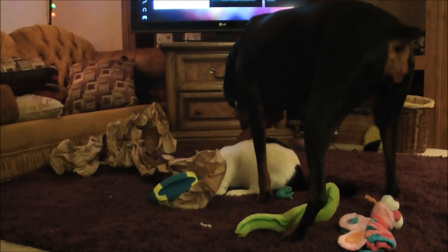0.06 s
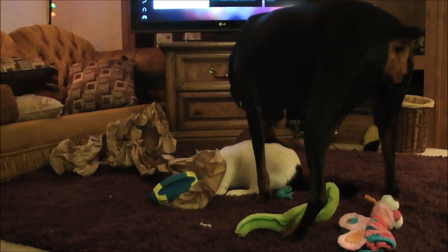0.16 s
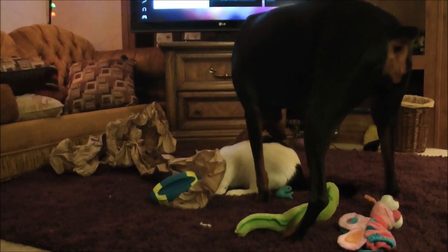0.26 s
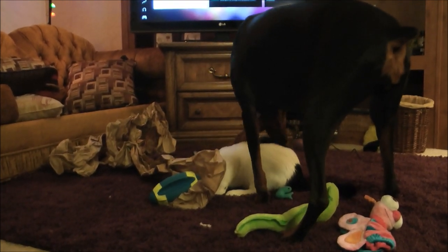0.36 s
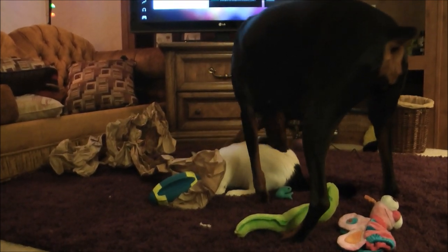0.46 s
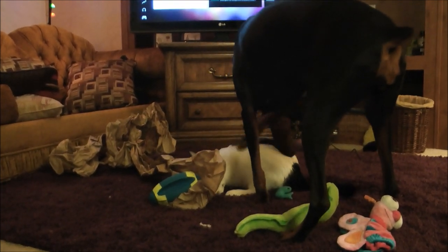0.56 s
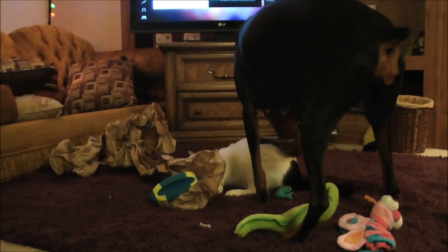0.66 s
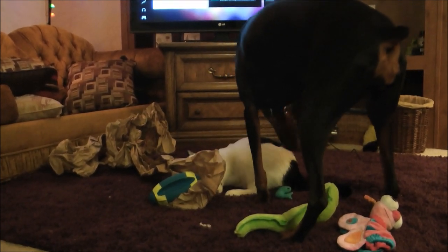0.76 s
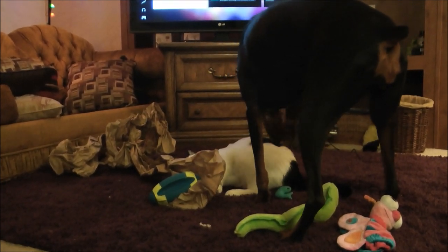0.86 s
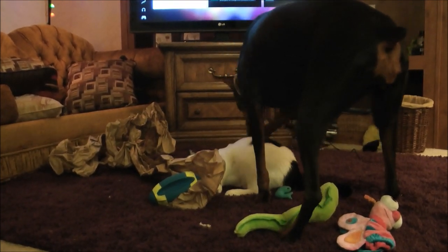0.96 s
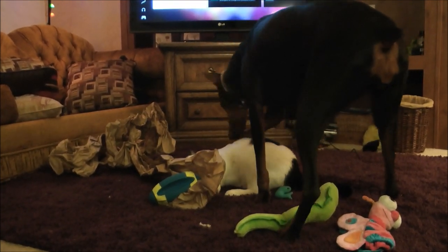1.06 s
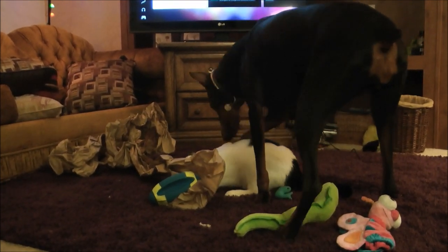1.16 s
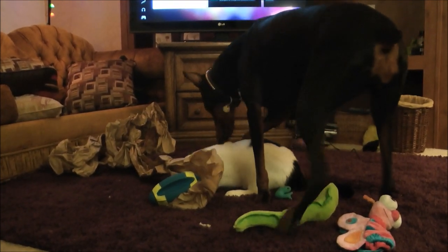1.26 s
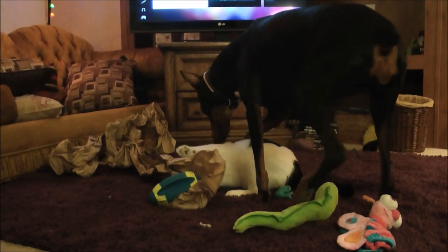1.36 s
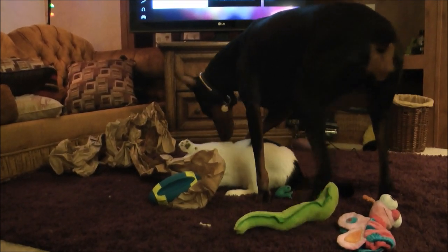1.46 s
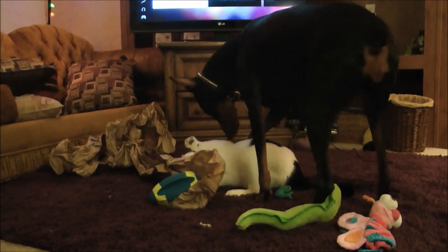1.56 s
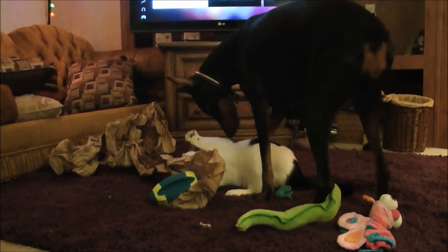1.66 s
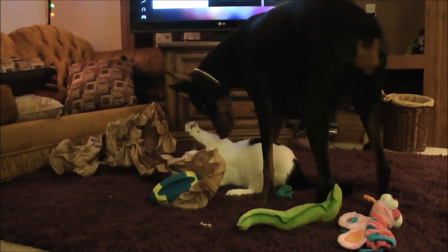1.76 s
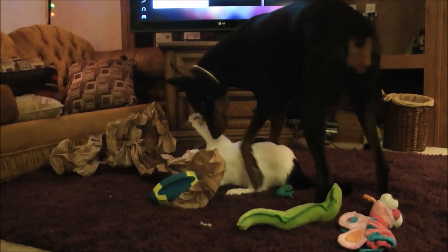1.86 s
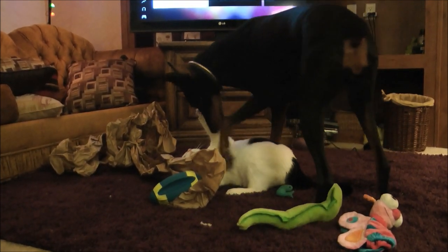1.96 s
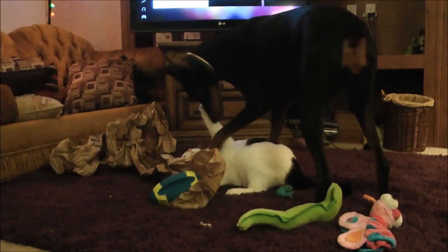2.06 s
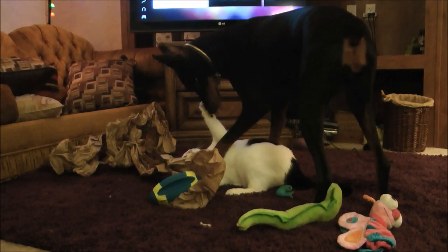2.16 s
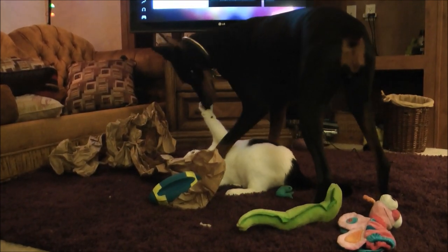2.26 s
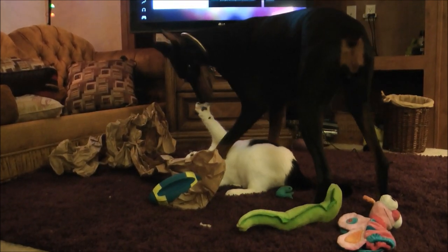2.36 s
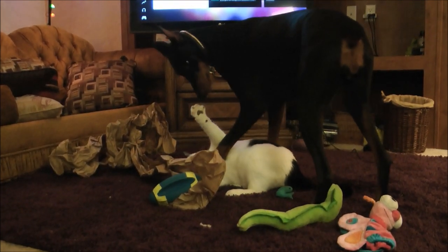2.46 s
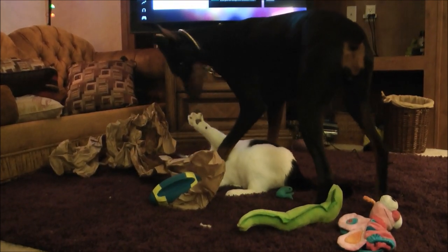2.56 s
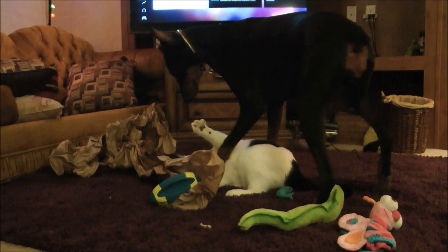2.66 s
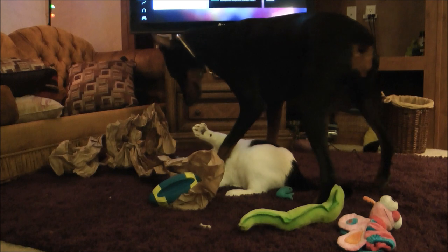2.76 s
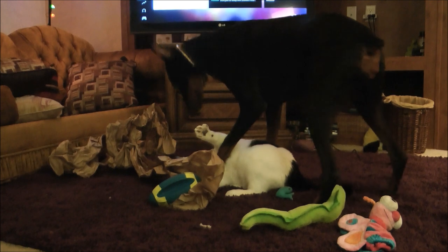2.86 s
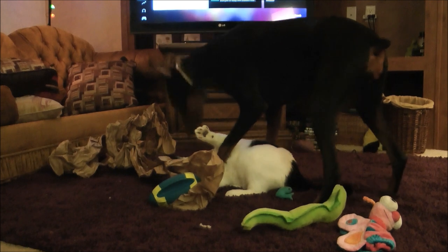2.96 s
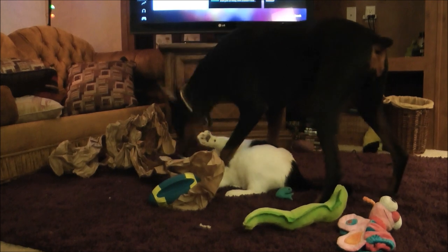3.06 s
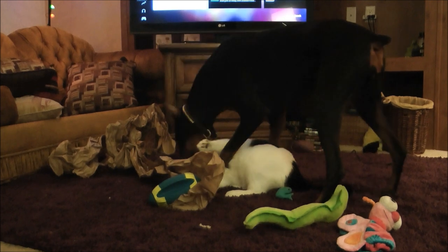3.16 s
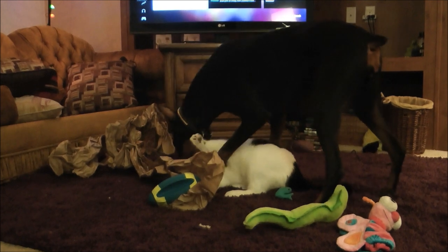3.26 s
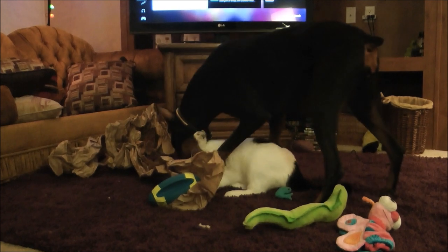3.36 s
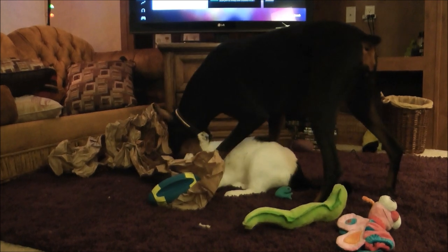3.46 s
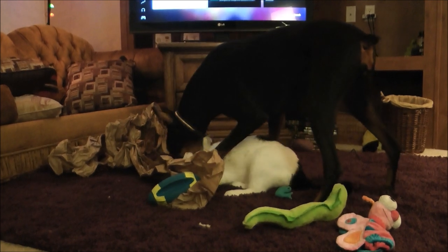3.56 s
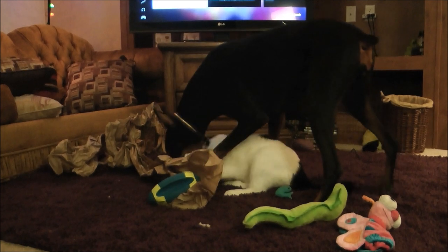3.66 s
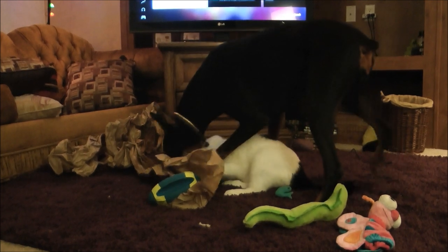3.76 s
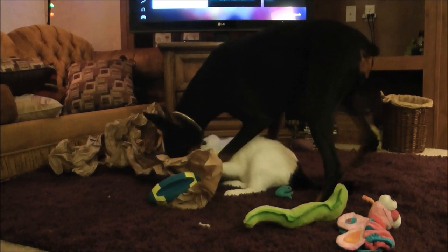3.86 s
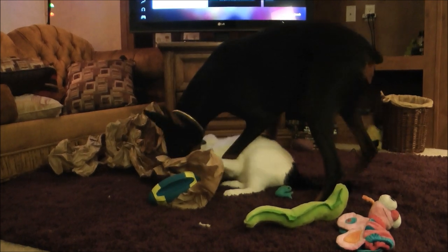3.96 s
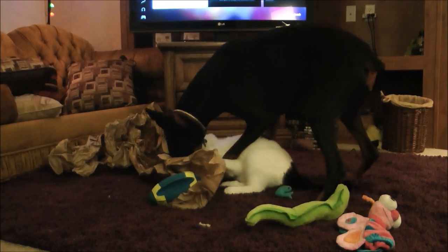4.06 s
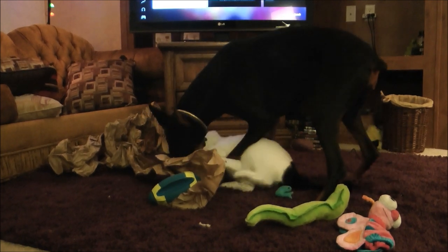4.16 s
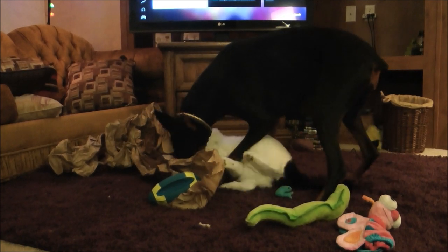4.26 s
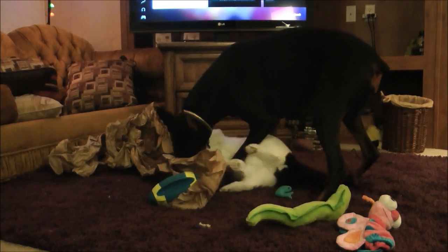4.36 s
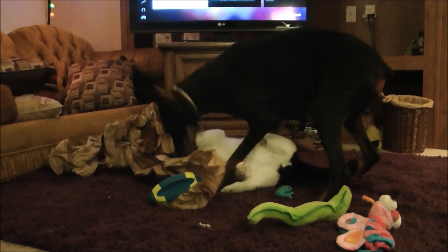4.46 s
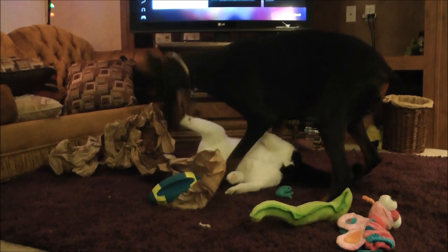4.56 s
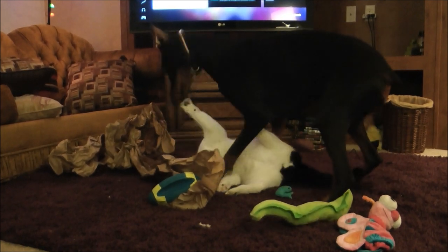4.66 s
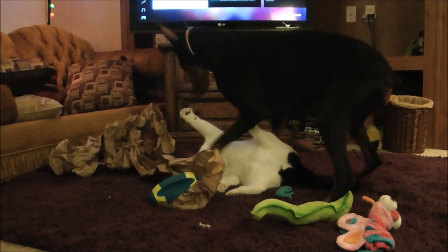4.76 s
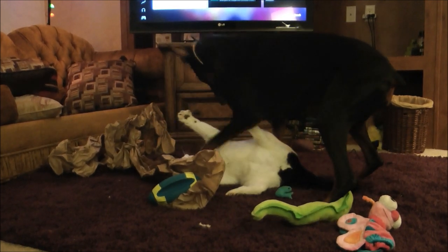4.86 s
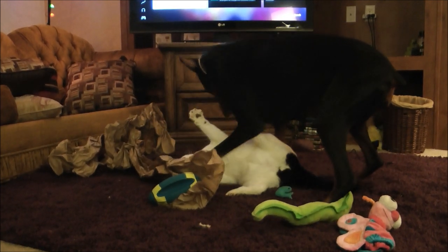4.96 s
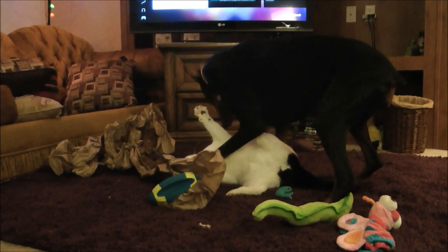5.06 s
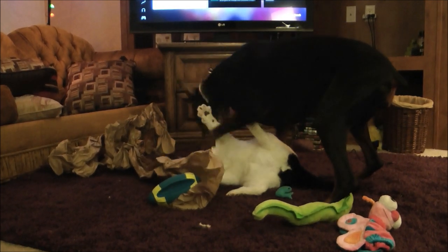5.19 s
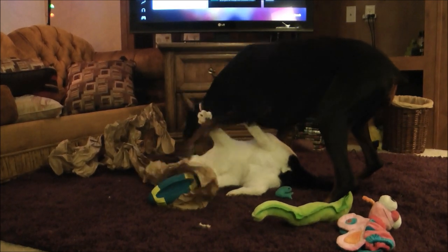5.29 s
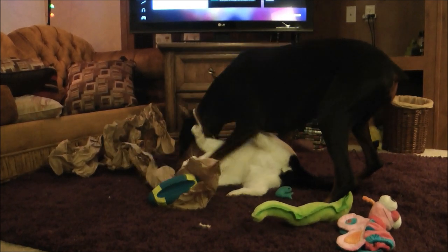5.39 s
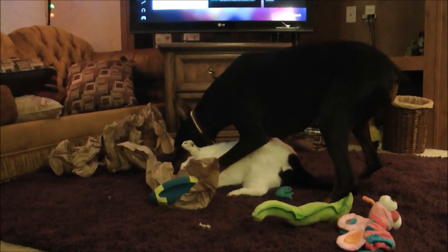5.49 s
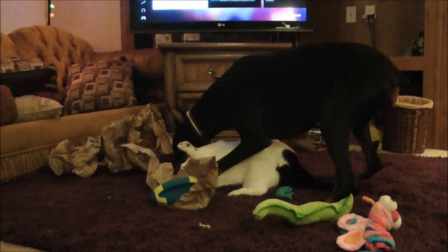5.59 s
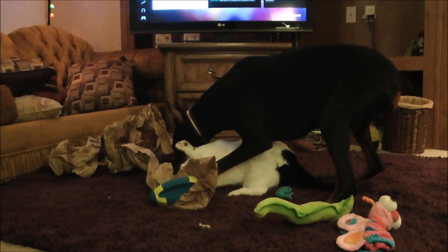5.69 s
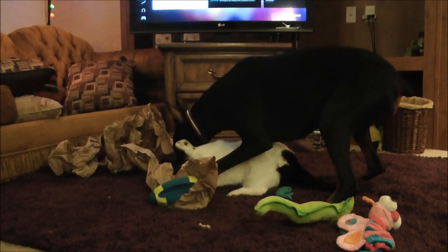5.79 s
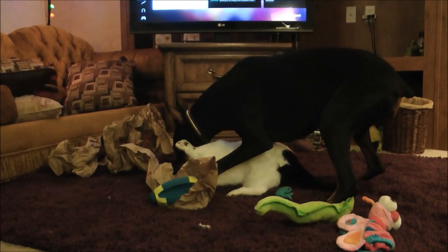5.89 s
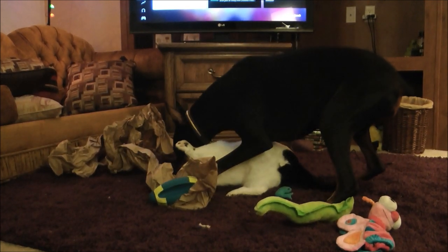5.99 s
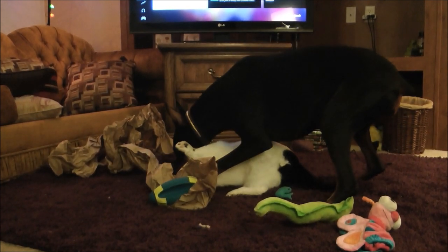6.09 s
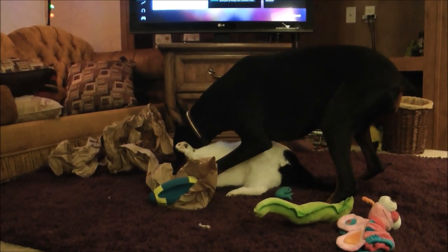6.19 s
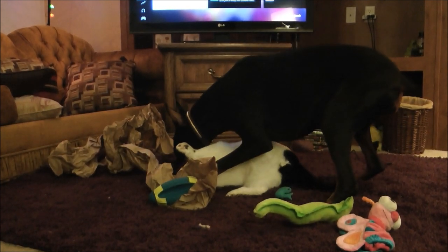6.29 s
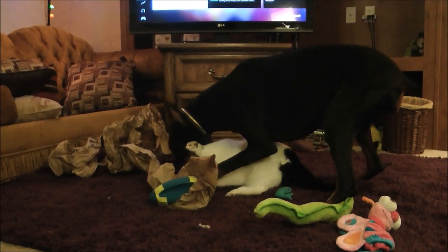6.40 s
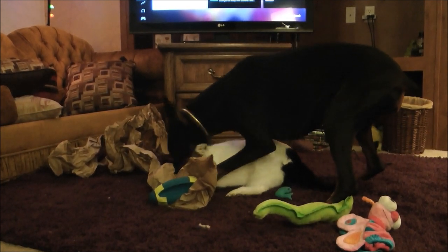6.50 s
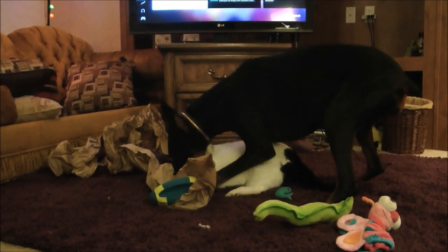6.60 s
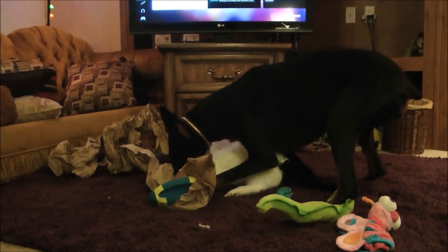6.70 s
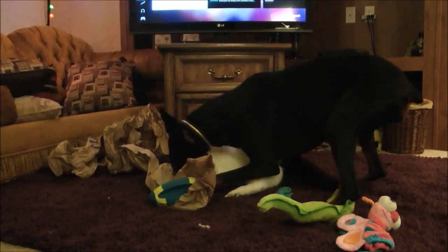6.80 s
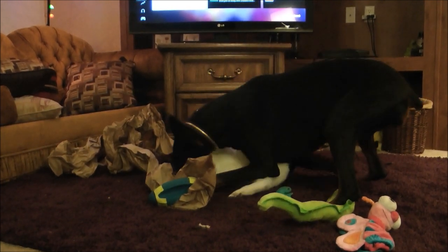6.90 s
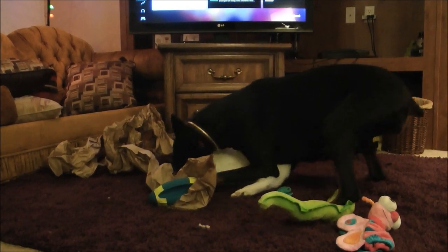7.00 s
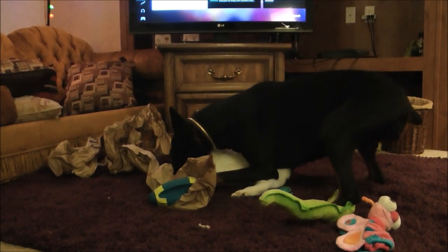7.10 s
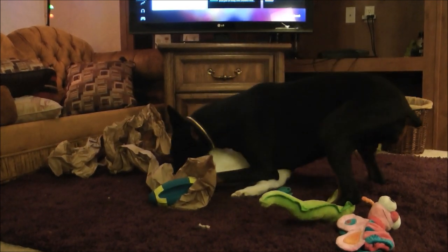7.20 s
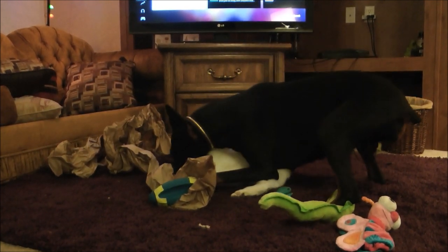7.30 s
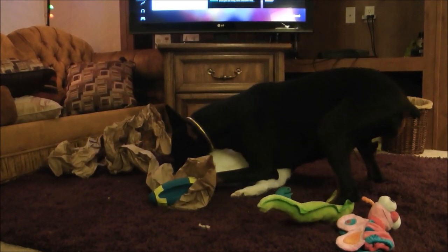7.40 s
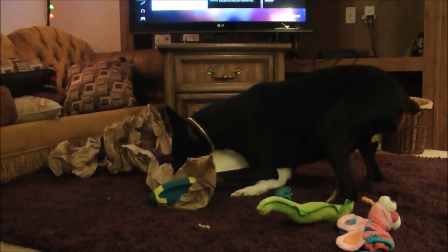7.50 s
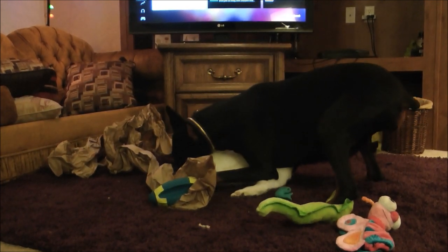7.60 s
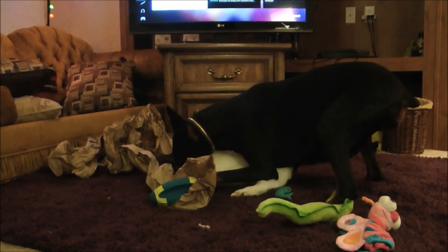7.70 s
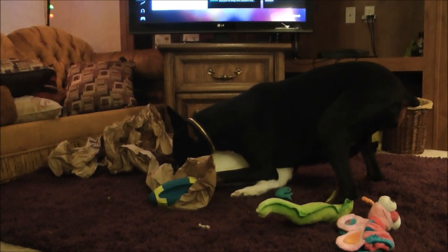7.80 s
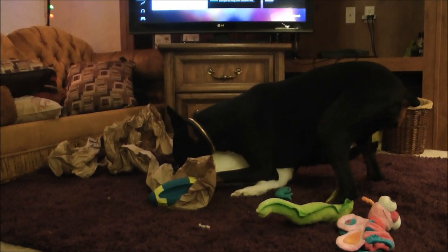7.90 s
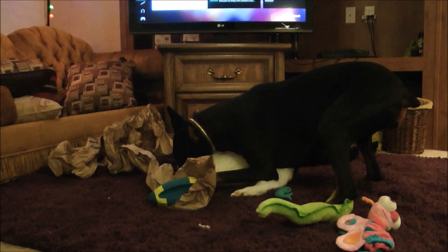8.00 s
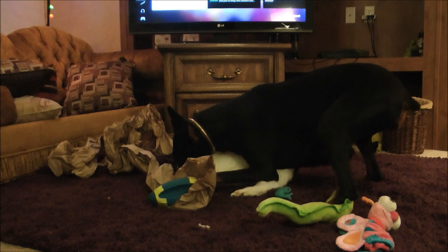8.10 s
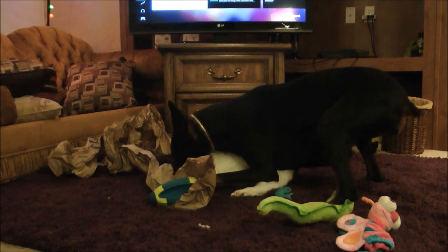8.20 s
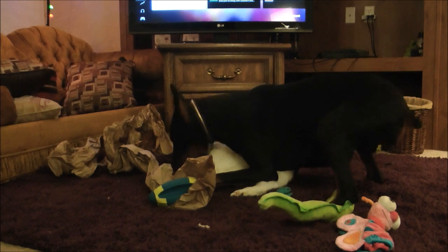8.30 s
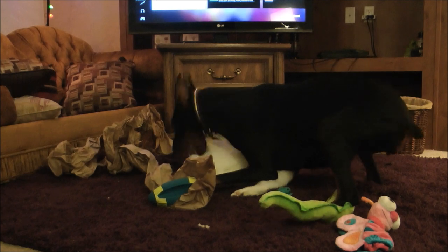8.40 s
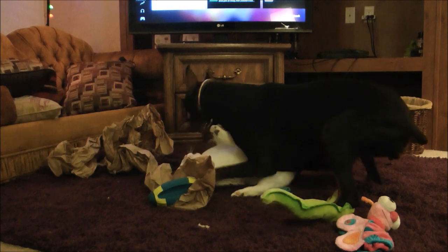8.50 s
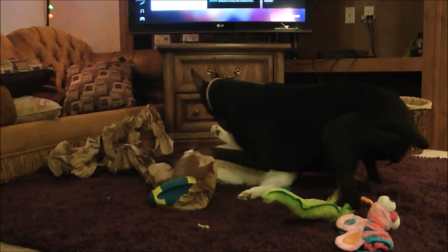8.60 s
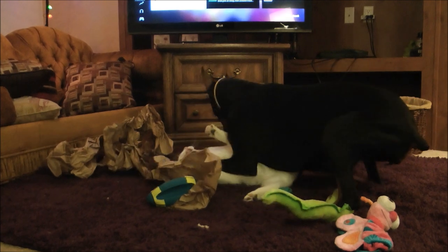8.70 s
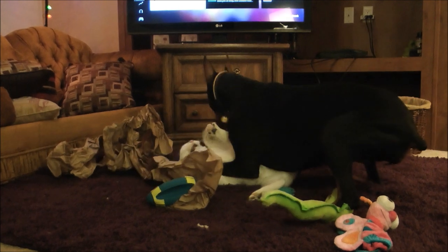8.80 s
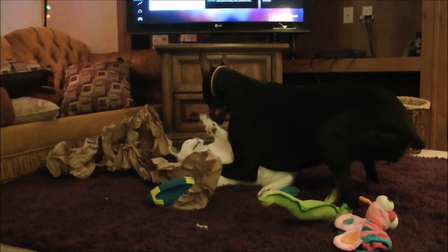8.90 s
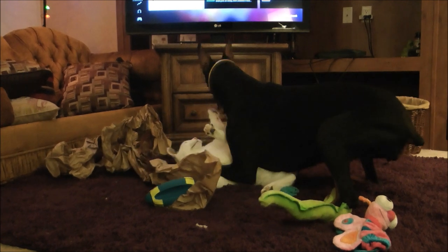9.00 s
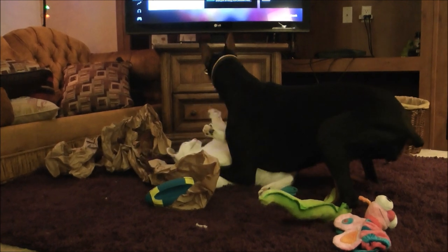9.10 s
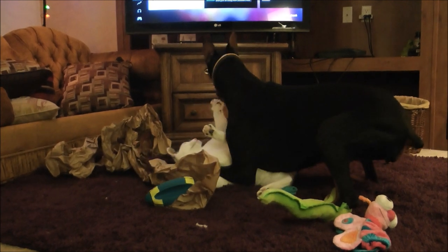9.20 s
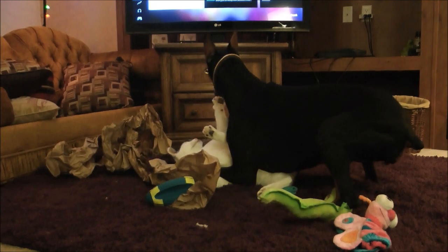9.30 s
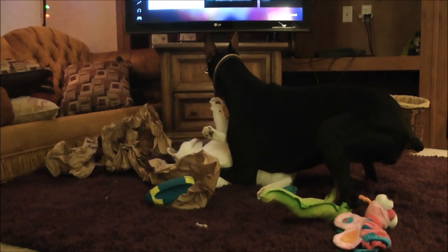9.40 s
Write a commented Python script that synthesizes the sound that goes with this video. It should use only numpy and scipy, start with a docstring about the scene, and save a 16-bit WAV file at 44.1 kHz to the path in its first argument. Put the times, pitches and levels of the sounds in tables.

```python
"""Dog and cat tussle in packing paper

A dog noses and paws at a cat on a living-room carpet, among wads of crumpled packing paper.
Random clicks and coloured noise follow each shove as paper crackle and carpet scuffs; short noise bursts
make the snaps, ticks and bumps, and a collar tag chimes once from decaying sines.
A fan and mains hum run behind as filtered noise and wavering tones. Loud peaks duck the level, which creeps back."""
import sys
import numpy as np
from scipy import signal
from scipy.fft import rfft, irfft
from scipy.io import wavfile
from scipy.ndimage import uniform_filter1d

SR = 44100
rng = np.random.default_rng(int(sys.argv[2]) if len(sys.argv) > 2 else 0)


def persist_wave(psi):
    """Save psi, clipped to +-1, as 16-bit WAV."""
    counts = np.round(np.clip(psi, -1, 1) * 32767).astype(np.int16)
    wavfile.write(sys.argv[1], SR, np.atleast_2d(counts).T)


N = 416744
TIME = np.arange(N) / SR


def undb(db):
    """Decibels to amplitude gain."""
    return 10 ** (np.asarray(db) / 20)


def unit(x):
    """Scale to rms 1."""
    return x / np.sqrt(np.mean(x ** 2))


def walk(rate):
    """Smooth random drift with a spread of 1, changing about rate times a second."""
    hold = max(int(SR / rate), 2)
    steps = np.repeat(rng.standard_normal(N // hold + 1), hold)
    return unit(uniform_filter1d(steps, hold)[:N])


def tilt(points, slope_db):
    """Tip a spectrum by so many dB per octave."""
    hz, db = np.transpose(points)
    return np.column_stack([hz, db + slope_db * np.log2(hz)])


def colour(x, points, size=4096):
    """Minimum-phase filter through (Hz, dB) points; white noise keeps its power."""
    hz, db = np.transpose(points)
    bins_hz = np.fft.rfftfreq(size, 1 / SR)
    gain = unit(undb(np.interp(np.log(bins_hz + 1), np.log(hz), db)))
    # folding the cepstrum forward in time makes the filter causal
    cepstrum = irfft(np.log(gain))
    cepstrum[1:size // 2] *= 2
    cepstrum[size // 2 + 1:] = 0
    impulse = irfft(np.exp(rfft(cepstrum)))
    return signal.fftconvolve(x, impulse)[:len(x)]


def resonate(x, hz, q):
    """One resonance with gain 1 at its centre, held to SR / 4 at most and a Q of 0.6 at least."""
    b, a = signal.iirpeak(min(hz, SR / 4), max(q, .6), fs=SR)
    return signal.lfilter(b, a, x)


def add(track, s, sound):
    """Mix a sound into a track at time s."""
    i = max(int(s * SR), 0)
    track[i:i + len(sound)] += sound[:N - i]


def clicks(rate, scatter_db):
    """Random clicks, rate a second, with a few much larger than the rest; rms 1."""
    hit = rng.random(N) < rate / SR
    size = undb(scatter_db * np.minimum(rng.exponential(size=N), 4))
    sign = rng.choice([-1, 1], N)
    # a denser stretch gets smaller clicks, so that its power stays even
    return unit(hit * size * sign / np.sqrt(rate))


def knocks(rows, q, size=8192):
    """Short pushes into a damped body that rings at one pitch."""
    track, t = np.zeros(N), TIME[:size]
    noises = rng.standard_normal((len(rows), size))
    for (s, db, hz, fade_s), noise in zip(rows, noises):
        push = noise * np.exp(-t / fade_s)
        ring = resonate(resonate(push, hz, q), hz, q / 2)
        add(track, s, undb(db) * ring / np.max(np.abs(ring)))
    return track


def room(x, ceiling_db, tail_db, side_db=-14, ceiling_s=.0094, path_spread=.06, t60=0.19):
    """Direct sound, a bounce off the ceiling and a short furnished-room tail; gives mid and side."""
    t = TIME[:SR // 2]
    build_up = np.clip(t / ceiling_s, 0, 1) ** 2
    tails = rng.standard_normal((2, len(t))) * build_up * np.exp(-np.log(1000) * t / t60)
    mid, side = undb(tail_db) * tails / np.linalg.norm(tails, axis=1, keepdims=True)
    mid[0] += 1  # direct sound
    bounce_s = ceiling_s * (1 + path_spread * rng.uniform(-1, 1))
    mid[int(bounce_s * SR)] += undb(ceiling_db)
    paths = np.array([mid, undb(side_db) * side]) / np.linalg.norm(mid)
    return signal.oaconvolve(x[None], paths, axes=1)[:, :N]


# moving air, spectrum shape in the mid: [pitch_hz, relative_level_db per Hz]
AIR_SPECTRUM = [(25, -16.5), (60, -4.5), (90, 5), (180, -2), (270, 2), (420, -3.5), (490, -12), (760, -6.5),
                (900, -19.5), (1330, -18.5), (1900, -11.5), (5000, -15.5), (8300, -25.5), (10000, -23)]
# moving air, spectrum shape of the left-right difference: [pitch_hz, relative_level_db per Hz]
AIR_SIDE_SPECTRUM = [(25, 3), (100, 2), (300, 9), (500, 1), (1000, -9.5), (5000, -23), (9000, -20),
                     (12000, -54)]
# narrow resonances in the fan's air noise: [pitch_hz, level_db rms, q without unit]
FAN_RESONANCES = [(1048, -81, 51), (1415, -81.5, 77), (2650, -79.5, 110)]
# steady tones of the mains and the fan: [pitch_hz, level_db rms in the mid, waver_hz]
HUM_TONES = [(121.8, -64.5, 0.43), (256, -74.5, 3), (409.4, -73.5, 1.8), (819.2, -70, 1.41)]


def fan(air_db=-63, side_db=-72.0, tone_side_db=-17):
    """Broad air noise, its narrow resonances and slightly wavering tones; gives mid and side."""
    mid = undb(air_db) * colour(rng.standard_normal(N), AIR_SPECTRUM)
    side = undb(side_db) * colour(rng.standard_normal(N), AIR_SIDE_SPECTRUM)
    for hz, db, q in FAN_RESONANCES:
        once = resonate(rng.standard_normal(N), hz, q / 2)
        mid = mid + undb(db) * unit(resonate(once, hz, q / 2))
    for hz, db, waver_hz in HUM_TONES:
        pitch_hz = hz + waver_hz * walk(10 + 2 * waver_hz)
        phase = 2 * np.pi * np.cumsum(pitch_hz) / SR
        mid = mid + np.sqrt(2) * undb(db) * np.sin(phase)
        side = side + np.sqrt(2) * undb(db + tone_side_db) * np.cos(phase)
    return np.array([mid, side])


# partials of the collar tag: [pitch_hz, level_db before the tag's own level, t60_s]
TAG_PARTIALS = [(8250, -5, 0.11), (9300, -12, 0.19), (9880, -22, 0.33), (10480, -26, .15),
                (10900, -18, 0.15)]


def tag(start_s=.627, level_db=-32, tick_db=-5, tick_s=0.0051, tick_hz=7000):
    """The metal tag knocks against its ring and chimes briefly."""
    track, t = np.zeros(N), TIME[:SR // 2]
    ring = 0
    for hz, db, t60 in TAG_PARTIALS:
        ring = ring + undb(db) * np.sin(2 * np.pi * hz * t) * np.exp(-np.log(1000) * t / t60)
    tick = resonate(rng.standard_normal(len(t)), tick_hz, 0.6) * np.exp(-t / tick_s)
    add(track, start_s, undb(level_db) * (ring + undb(tick_db) * tick))
    return track


# small pitched ticks and scrapes: [start_s, peak_db before the room, pitch_hz, fade_s]
SMALL_TICKS = [(.573, -35.5, 2280, 0.0018), (.592, -45, 2720, 0.0022), (.735, -51, 7100, 0.012),
               (1.12, -45.5, 4940, 0.033), (2.06, -44.5, 2200, 0.007), (2.241, -44, 4500, 0.0027),
               (7.074, -36, 2130, 0.0049)]


def ticks():
    """Small ticks and scrapes, each a brief noise push into a pitched resonance."""
    return knocks(SMALL_TICKS, q=3.9)


# soft bumps of paws and bodies: [start_s, peak_db before the room, pitch_hz, fade_s]
BODY_BUMPS = [(1.24, -52, 606, 0.0056), (1.49, -64, 455, 0.011), (1.64, -60, 65, .03),
              (3.845, -41.5, 557, 0.0092), (4.06, -50, 107, 0.01), (4.422, -40.5, 320, 0.0075),
              (5.358, -33.5, 540, 0.003), (5.39, -35, 270, 0.0091), (5.52, -31, 280, 0.0071),
              (5.622, -32, 545, 0.0021), (6.9, -55, 60.3, .03), (6.973, -38, 700, 0.0042)]


def bumps():
    """Paws and bodies land softly, each a brief push into a low, well-damped resonance."""
    return knocks(BODY_BUMPS, q=2.7)


# carpet scuff, spectrum shape: [pitch_hz, relative_level_db per Hz]
CARPET_SPECTRUM = [(25, -39), (45, -34), (80, -16), (130, -7.5), (200, -10.5), (310, 1.5), (460, -9.5),
                   (570, -6.5), (760, -5), (900, -20.5), (1500, -28), (4000, -77)]


def scuffs(drag_db, rate=2500, catch_db=2, catch_rate=70):
    """Carpet pile catches and lets go in dense, dull slips."""
    catch = undb(catch_db * np.tanh(walk(catch_rate)))
    slips = clicks(rate, scatter_db=2) * catch
    return colour(unit(slips) * undb(drag_db), CARPET_SPECTRUM)


# sharp clicks, of snapping creases or the dog's teeth:
# [start_s, level_db before the trim and the room, brightness_db per octave]
SHARP_SNAPS = [(1.24, -46.5, 3.5), (1.833, -44.5, 2), (1.958, -45.5, 2.5), (2.085, -33.5, 0.5),
               (2.593, -28.5, 1.5), (2.724, -49.5, -1), (3.573, -28.5, -.5), (3.779, -35.5, 2.5),
               (3.84, -35.5, 0), (3.854, -38.5, 3.5), (4.617, -36.5, -0.5), (4.74, -25.5, 1.5),
               (5.057, -33, -0.5), (5.079, -33, -.5), (5.251, -40, 1.5), (5.306, -38.5, 5),
               (5.358, -24.5, 1), (5.388, -23.5, 2), (5.432, -22.5, 3.5), (5.441, -21.5, 2.5),
               (5.51, -17, 3), (5.571, -21, 4), (5.66, -36, 8.5), (5.709, -18, 0.5), (6.358, -34, -2.5),
               (6.542, -30.5, -0.5), (6.63, -30, 0), (6.638, -30.5, 1), (6.657, -24, 0), (6.706, -30, 3),
               (6.797, -31, 2.5), (6.911, -29.5, -0.5), (6.972, -35.5, -1.5), (7.119, -35, 4),
               (8.47, -40, -0.5), (8.536, -39, 2.5), (8.573, -28.5, 3), (8.582, -42, 0.5), (8.738, -21, 1),
               (8.764, -20.5, 5), (8.923, -36, -1.5), (9.023, -39, -0.5), (9.045, -34, 3.5),
               (9.126, -30.5, 0), (9.371, -39.5, -0.5)]
# sharp click, spectrum shape before the brightness tilt: [pitch_hz, relative_level_db per Hz]
CLICK_SPECTRUM = [(400, -22), (800, -11), (1150, -14.5), (1600, -3.5), (2100, 6.5), (3000, 2.5),
                  (4500, -0.5), (6250, -1), (8500, -14), (11000, -17.5), (15500, -24)]


def snaps(trim_db=-1, size=4096, count=4):
    """A hard contact lasts a few milliseconds, rings and settles; brighter ones ring higher."""
    buckle_s, settle_s, settle_db = 0.0019, 0.013, -17
    ring_db, ring_q, ring_hz, ring_octaves_per_db = -4, 3, 3650, 0.6
    places, t = np.zeros((count, N)), TIME[:size]
    shape = np.exp(-(t / buckle_s) ** 2 / 2) + undb(settle_db) * np.exp(-t / settle_s)
    noises = rng.standard_normal((len(SHARP_SNAPS), size))
    for k, ((s, db, slope_db), noise) in enumerate(zip(SHARP_SNAPS, noises)):
        push = noise * shape
        ring = resonate(push, ring_hz * 2 ** (ring_octaves_per_db * slope_db), ring_q)
        pop = colour(push + undb(ring_db) * ring, tilt(CLICK_SPECTRUM, slope_db))
        level = undb(db + trim_db) * np.linalg.norm(shape) / np.linalg.norm(pop)
        add(places[k % count], s, level * pop)
    # the clicks take turns among several places in the room
    return sum(room(place, ceiling_db=-4.0, tail_db=-1, side_db=-14.0) for place in places)


# paper, spectrum shape before each patch's tilt: [pitch_hz, relative_level_db per Hz]
PAPER_SPECTRUM = [(400, -21.5), (800, -7.5), (900, -24.5), (1080, -8.5), (1300, -10.5), (1700, -1),
                  (2100, 3), (3200, 2), (4800, 1.5), (6300, -5.5), (8400, -14.5), (11500, -23),
                  (15500, -29.5)]


def paper(push_db, crisp, count=5):
    """Creases buckle, sheets slide and stiff folds crack, more often in a harder push; crispness adds treble."""
    # clicks a second, for all patches together at the hardest push
    buckle_rate, crack_rate, rate_slope = 560, 1000, .17
    buckle_s, slide_db, crack_db = 0.0025, -4.0, -5.5
    spread_db, flutter_db, flutter_rate = 3, 4.5, 40
    activity = undb(rate_slope * (push_db - np.max(push_db))) / count
    gain = undb(push_db) / np.sqrt(count)
    out = 0
    # each patch has its own brightness and its own place in the room
    for slope_db in np.linspace(-spread_db, spread_db, count):
        crackle = clicks(buckle_rate * activity, scatter_db=3.5)
        # every crease gives way in a tiny burst, over the even hiss of sliding
        power = signal.lfilter([1], [1, -np.exp(-2 / (buckle_s * SR))], crackle ** 2)
        envelope = np.sqrt(power / np.mean(power) + undb(2 * slide_db))
        force = envelope * rng.standard_normal(N)
        # the load hops from patch to patch, so the colour keeps shifting
        force = force * undb(flutter_db * np.tanh(walk(flutter_rate)))
        # stiff folds crack in a single instant
        cracks = clicks(crack_rate * activity, scatter_db=4.0)
        force = unit(unit(force) + undb(crack_db) * cracks)
        force = force + crisp * np.diff(force, prepend=0)
        patch = colour(force * gain, tilt(PAPER_SPECTRUM, slope_db))
        out = out + room(patch, ceiling_db=-0.5, tail_db=-2.0, side_db=-15.0)
    return out


# shoves of nose, paws and bodies: [start_s, length_s, paper_level_db,
# carpet_level_db against the paper, crispness_db of the creases]
BODY_SHOVES = [(0.184, 0.13, -66, -12, -4.5), (1.26, .11, -54.5, -9.5, -13.5),
               (1.449, 0.052, -58.5, -0.5, -25), (1.557, 0.11, -64.5, -11, -5),
               (1.723, 0.23, -65.5, -16, 7), (2.143, 0.08, -64, -21, -22), (2.645, .1, -62, -1.5, -18),
               (2.843, 0.14, -60.5, -23, -3), (3.077, 0.044, -57.5, -8, -25), (3.115, .19, -65.5, -6, -14),
               (3.405, 0.085, -59.5, -2.5, -19), (3.593, 0.17, -58.5, -8, -10),
               (3.738, 0.033, -44.5, -16, -17), (3.787, 0.14, -47.5, -10.5, -8),
               (3.963, 0.13, -52.5, -15.5, -8), (4.17, 0.092, -47.5, -23, -31), (4.32, 0.13, -55, -9, -18),
               (4.455, 0.16, -47, -11.5, -5), (4.864, 0.23, -59, -8, -10), (5.285, 0.028, -40, -14, 1),
               (5.359, 0.027, -30, -6, -4), (5.425, 0.038, -29.5, -12, -8), (5.489, 0.051, -20, -14, -5),
               (5.587, 0.1, -43.5, -12, -31), (6.419, 0.15, -42, -17, -19), (6.637, 0.093, -40, -19.5, -12),
               (6.774, 0.17, -49.5, -9, -30), (7.024, 0.16, -54.5, -12.5, -22),
               (7.613, 0.069, -58.5, -12, -20), (8.223, 0.22, -58.5, -9, -17),
               (8.479, 0.086, -43.5, -12, -13), (8.647, 0.057, -33, -15.5, -5),
               (8.728, 0.041, -25, -14.5, 5), (8.779, 0.021, -23.5, -15.5, -0.5),
               (8.871, 0.017, -43.5, -2, -20), (9.004, 0.064, -41, -11, -11)]


def effort():
    """Shoves drive paper and carpet together; gives both levels in dB and the crispness as a gain."""
    # between shoves the animals never keep quite still
    fidget_db, fidget_wander_db, fidget_rate = -78.5, -1, 4
    # a shove builds, holds and lets go, in shares of its length
    attack_share, release_share = 0.79, 0.72
    # then the crushed paper relaxes faintly; the carpet level gets the same tail
    relax_db, relax_s = -30, 0.21
    fidget_power = undb(2 * (fidget_db + fidget_wander_db * walk(fidget_rate)))
    paper_power = carpet_power = fidget_power
    crisp = 0
    for s, length, db, carpet_db, crisp_db in BODY_SHOVES:
        attack = np.sin(np.pi / 2 * np.clip((TIME - s) / (attack_share * length), 0, 1)) ** 2
        after = np.clip(TIME - s - length, 0, 2)
        release = np.exp(-after / (release_share * length)) + undb(relax_db) * np.exp(-after / relax_s)
        power = (undb(db) * attack * release) ** 2
        paper_power = paper_power + power
        carpet_power = carpet_power + power * undb(2 * carpet_db)
        crisp = crisp + power * undb(crisp_db)
    # overlapping shoves share the crispness by their power
    return 10 * np.log10(paper_power), 10 * np.log10(carpet_power), crisp / paper_power


def scene(side_top_hz=10500):
    """The tussle in the middle of the stereo image; the highest treble is the same left and right."""
    push_db, drag_db, crisp = effort()
    floor = room(scuffs(drag_db) + bumps(), ceiling_db=-10.0, tail_db=-5.5, side_db=-9)
    small = room(tag() + ticks(), ceiling_db=-32, tail_db=-1.5)
    mid, side = fan() + small + floor + snaps() + paper(push_db, crisp)
    side = signal.sosfilt(signal.butter(10, side_top_hz, fs=SR, output="sos"), side)
    return np.array([mid + side, mid - side])


def gain_control(x, limit_db=-27.5, release_s=1.41):
    """Turns down whatever exceeds the limit at once, and recovers slowly."""
    power = uniform_filter1d(np.mean(x ** 2, axis=0), int(.025 * SR))
    over_db = np.maximum(10 * np.log10(np.abs(power) + 1e-18) - limit_db, 0)
    fade = np.exp(-TIME / release_s)
    # the strongest cut so far, each one fading from its own moment
    cut_db = np.maximum.accumulate(over_db / fade) * fade
    return x * undb(-cut_db)


def record(dry, top_hz=15900):
    """Gain control rides the level, then a steep low-pass cuts the top."""
    low_pass = signal.ellip(10, .2, 70, top_hz, fs=SR, output="sos")
    return signal.sosfilt(low_pass, gain_control(dry))


dry = scene()
out = record(dry)
persist_wave(out)
```